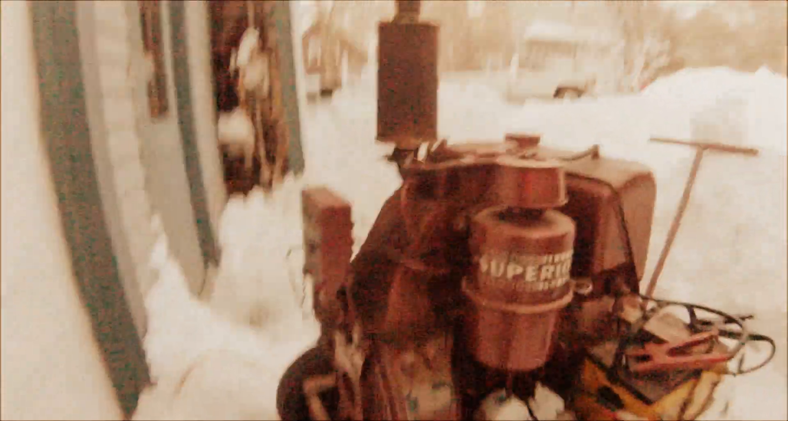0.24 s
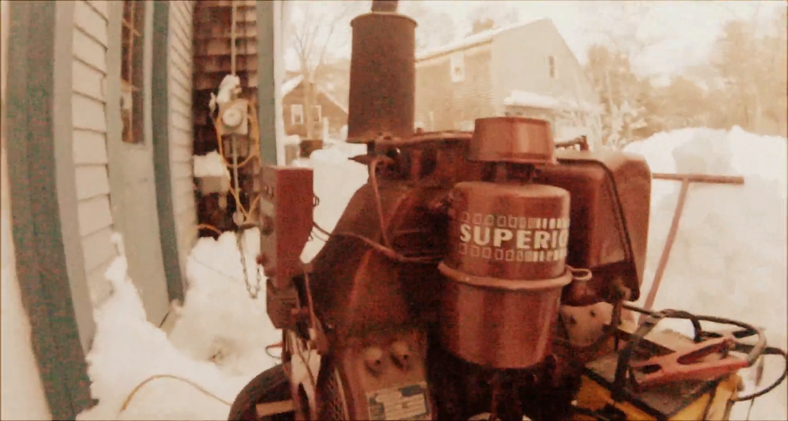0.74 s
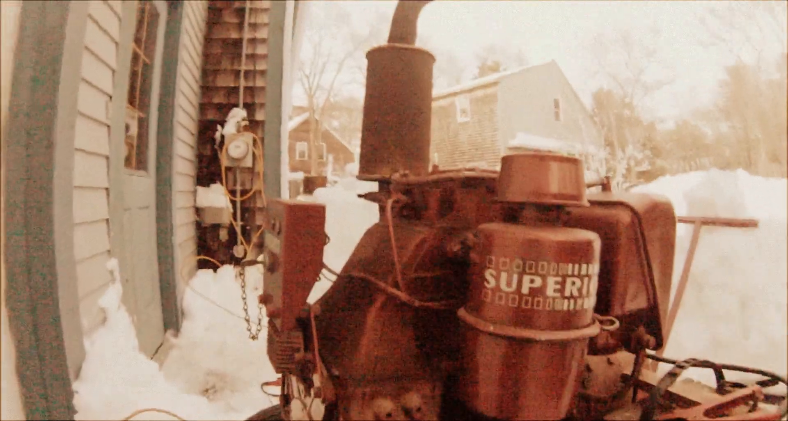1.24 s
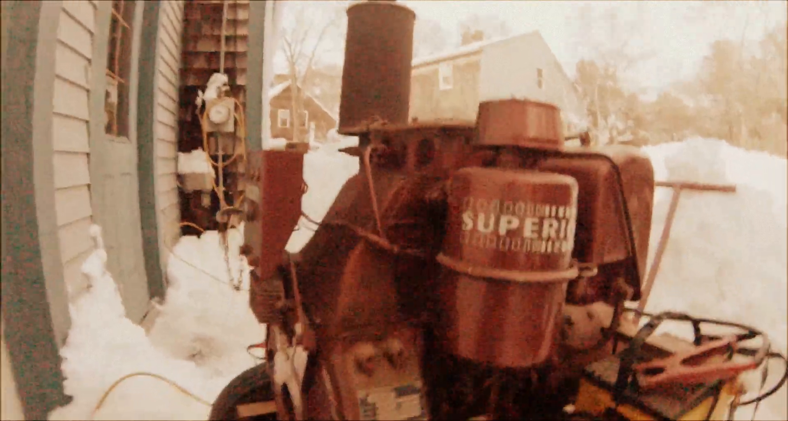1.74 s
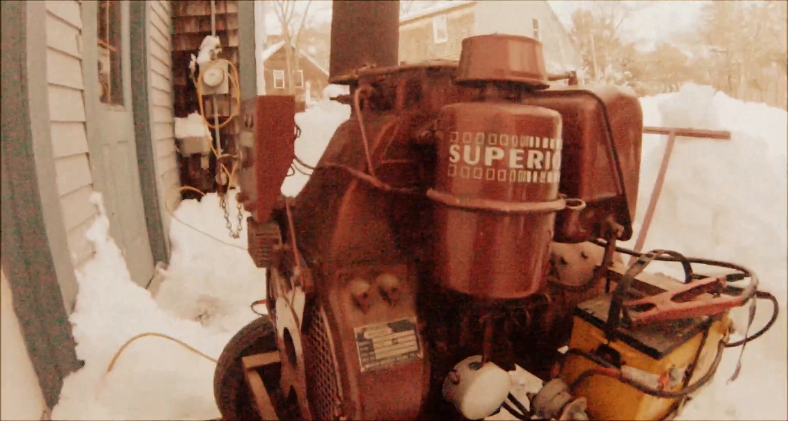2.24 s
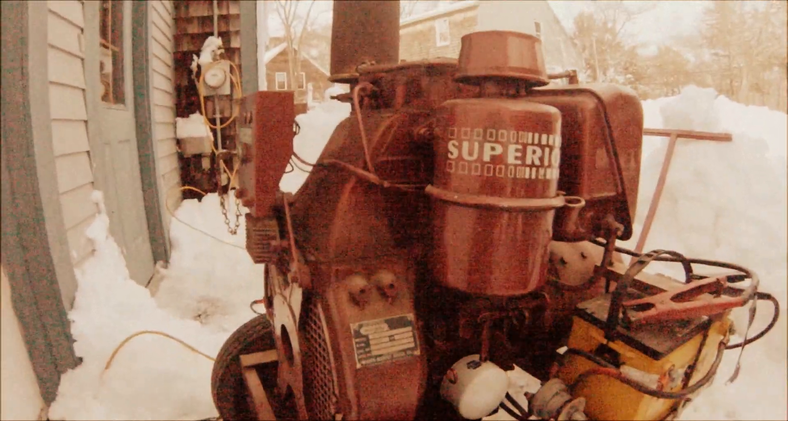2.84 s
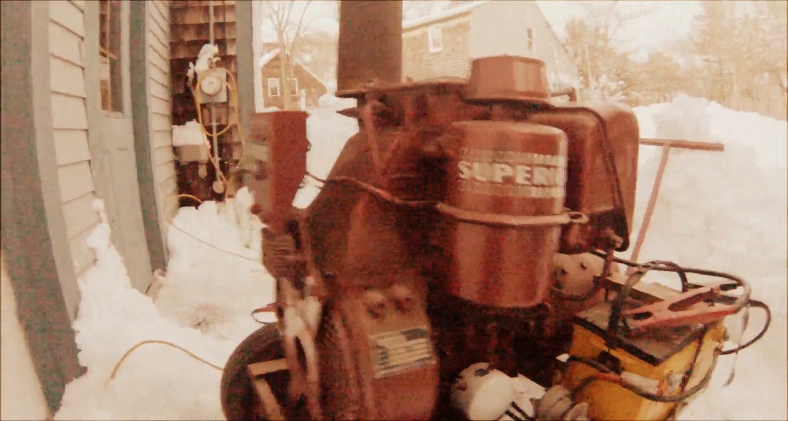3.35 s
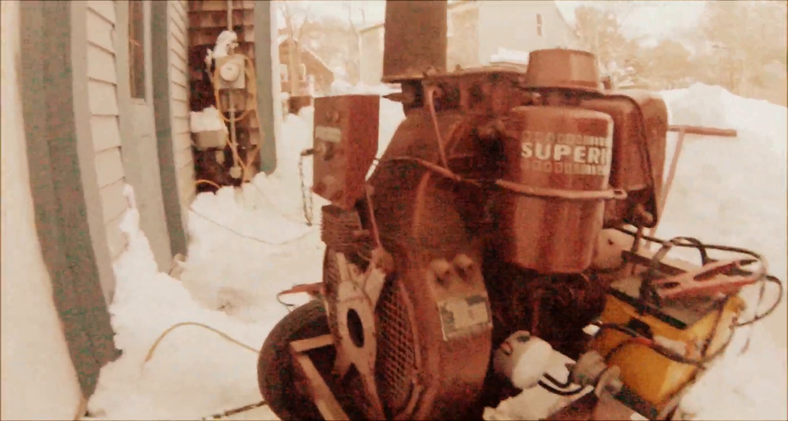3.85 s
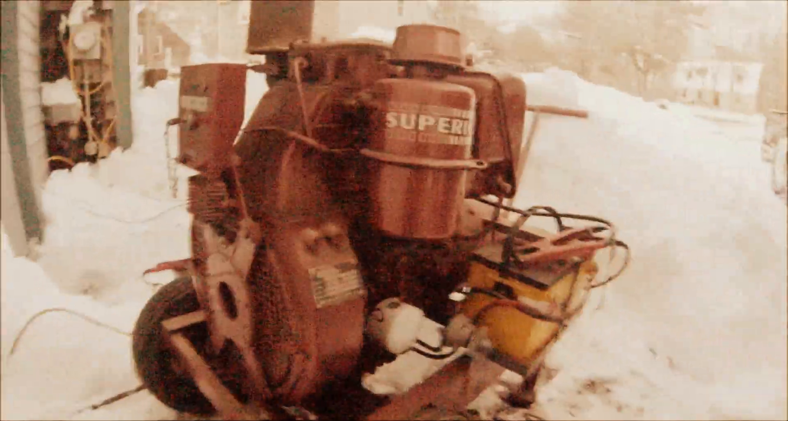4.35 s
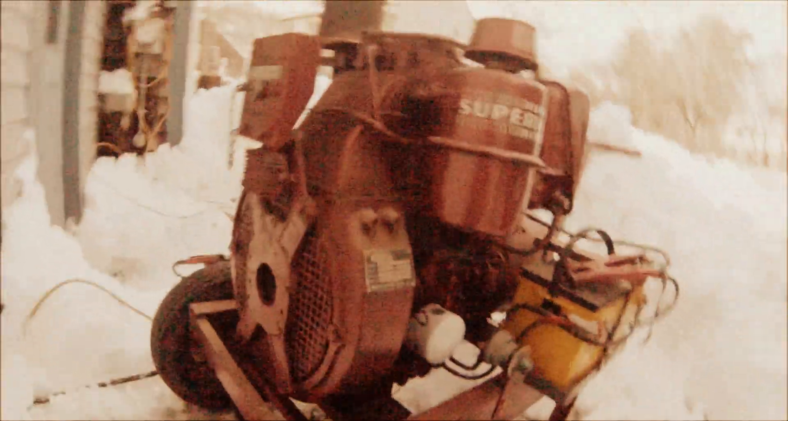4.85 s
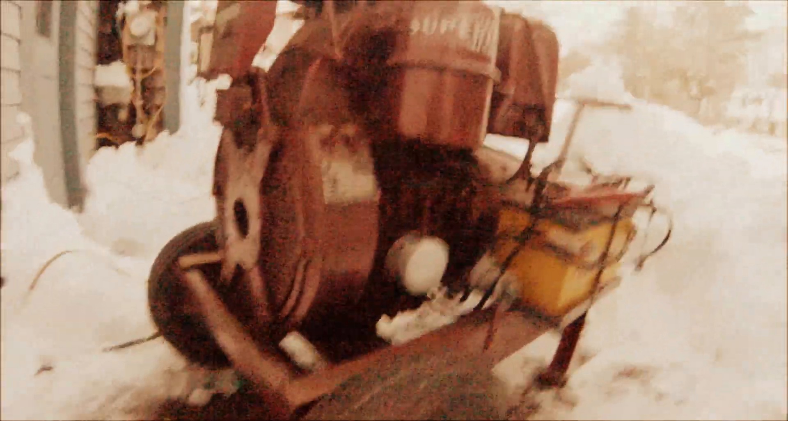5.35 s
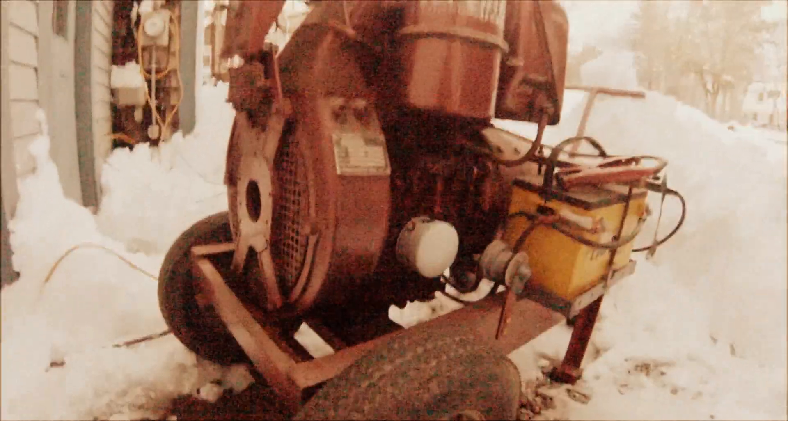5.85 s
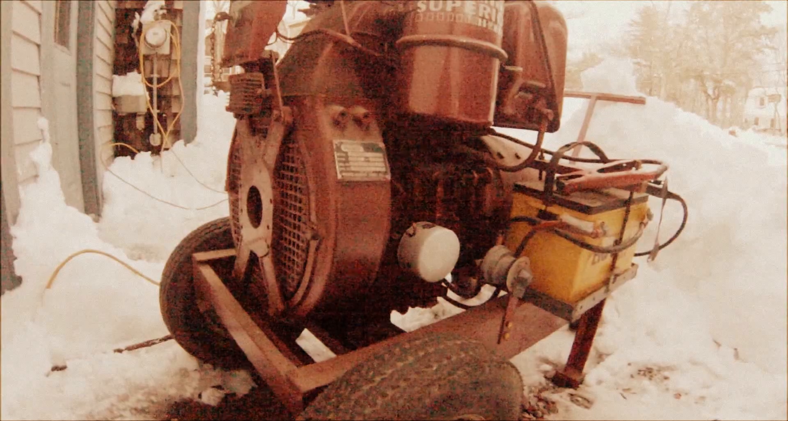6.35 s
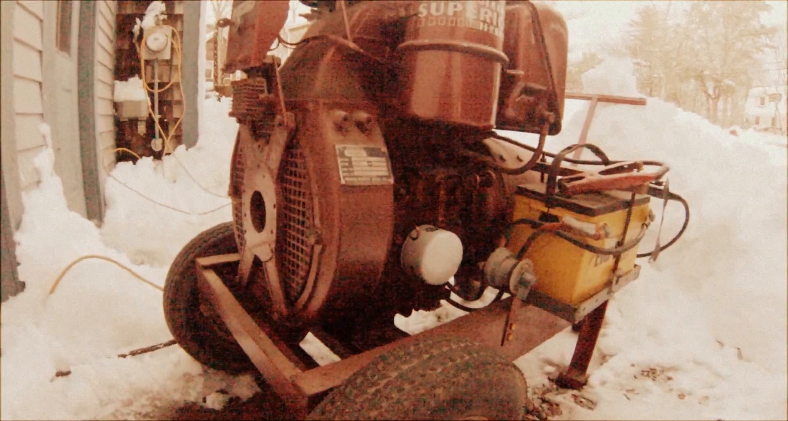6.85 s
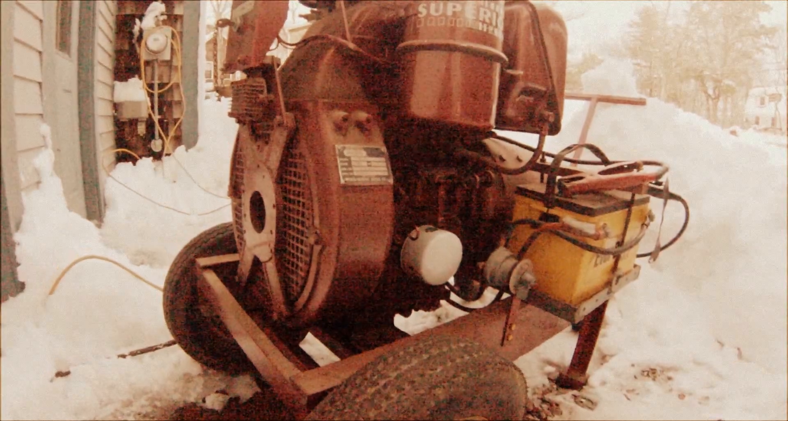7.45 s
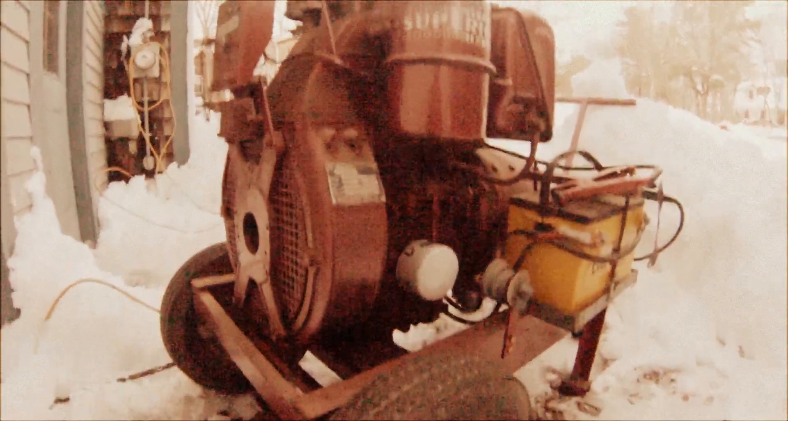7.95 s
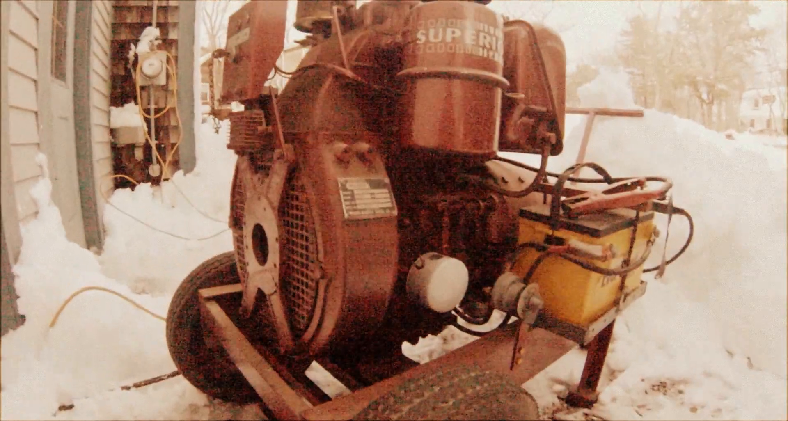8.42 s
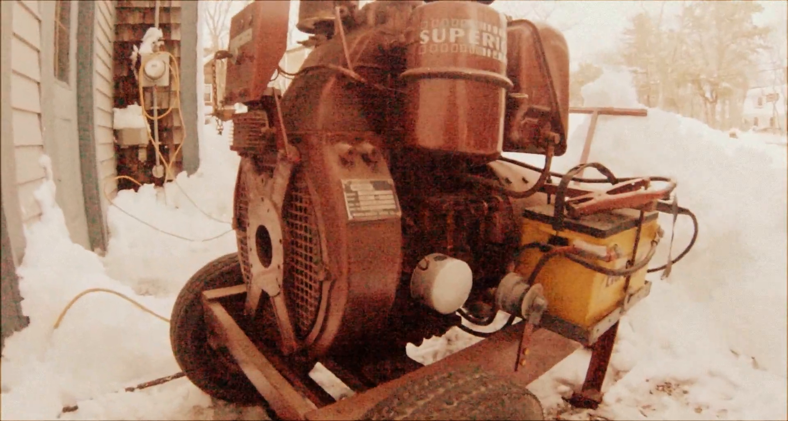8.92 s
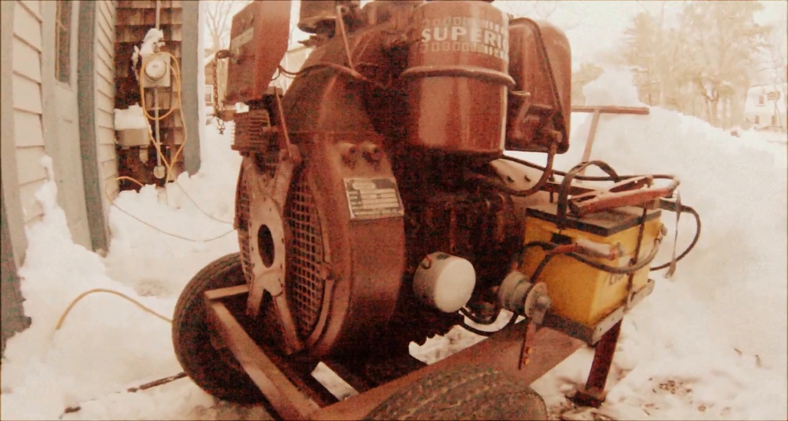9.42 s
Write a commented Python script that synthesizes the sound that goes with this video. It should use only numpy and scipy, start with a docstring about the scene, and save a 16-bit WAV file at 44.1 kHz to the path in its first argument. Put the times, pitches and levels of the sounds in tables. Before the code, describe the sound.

Close, even chugging and metallic rattle from a diesel generator, with dull microphone knocks and faint steps in snow around the middle.

```python
"""Single-cylinder four-stroke diesel generator at governed speed, in snow beside a house.
Each cycle: exhaust thump, piston knocks shaking the castings, valve ticks. Blower and gears whine above.
The microphone is carried from cylinder head down to crankcase. The hand rubs and bumps its case;
packed snow crunches underfoot."""
import sys
import numpy as np
from scipy import signal
from scipy.fft import irfft
from scipy.io import wavfile

SR = 44100
rng = np.random.default_rng(int(sys.argv[2]) if len(sys.argv) > 2 else 0)


def inscribe(sig):
    """Save sig as 16-bit PCM at rate SR to the path in sys.argv[1].

    A 1-D sig is mono; a 2-D sig holds one channel per row.
    Samples are clipped to [-1, 1] before scaling.
    """
    pcm = np.round(np.clip(np.atleast_2d(sig).T, -1, 1) * 32767)
    wavfile.write(sys.argv[1], SR, pcm.astype(np.int16))


N = 426888
TIME_S = np.arange(N) / SR
GOVERNED_RPM, HUNT_RPM, HUNTS_PER_S = 1835.0, .5, 2.0
START_CYCLE, PEAK_LOAD_TURN = .188, .38

# Levels are relative within a layer. Head, crankcase: level with the microphone there.
# Microphone path: (time [s], place [0 head .. 1 crankcase], whine gain [dB])
MIC_PATH = [(0, 0.17, -1.5), (.65, 0.069, 1.5), (1.4, 0, 0), (3.5, .18, 1.3), (4.5, 0.4, -1.5),
            (5.6, 0.87, 0.5), (7, 0.91, -0.7), (9.68, 0.69, 1.5)]
# Steps in snow: (time [s], hold [s], level [dB])
SNOW_STEPS = [(4.24, .02, -41), (4.48, 0.13, -35), (4.67, 0.03, -35), (4.88, 0.46, -38.5), (5.8, .02, -41)]
# Grip shifts: (time [s], hold [s], level [dB])
GRIP_RUBS = [(.14, 0.18, -32), (4.24, 0.033, -35.5), (4.38, 0.33, -32.5), (4.8, 0.5, -34), (5.7, 0.23, -35)]
# Finger bumps: (time [s], thud level [dB], thud pitch [Hz], click level [dB])
FINGER_BUMPS = [(.985, -21.5, 170, -39), (1.866, -23, 140, -47), (4.052, -14, 130, -45),
                (4.077, -10, 165, -20.5), (4.244, -18.5, 40, -25), (4.37, -15, 147, -33),
                (4.451, -15.5, 58, -45), (4.575, -11, 139, -28), (4.88, -9, 252, -36),
                (5.021, -10, 138, -27), (5.679, -10, 122, -44), (5.804, -9, 182, -31),
                (5.945, -20, 178, -42)]
# Microphone case modes: (frequency [Hz], t60 [s], level [dB])
MIC_CASE_MODES = [(490, 0.0073, -27), (655, 0.021, -0.5), (1350, 0.016, 2.5), (1560, 0.011, 4.5)]
# Blower and gear tones: (order [per crank turn, rounded in use], head [dB], crankcase [dB])
WHINE_ORDERS = [(15, -58, -49.5), (16, -51, -55), (17, -47.5, -57), (18, -56, -44.5), (19, -57.5, -49),
                (23, -63, -56), (33, -62, -50.5), (34, -55.5, -51.5), (35, -46.5, -51.5),
                (35.5, -43.5, -46.5), (37, -49, -60), (45, -47, -56.5), (47, -42.5, -45.5), (48, -50, -69),
                (50.54, -39.5, -50), (51, -65, -56), (52, -47, -48), (54, -42.5, -43), (54, -58, -43),
                (72.58, -42, -45), (71.04, -43, -44), (74.2, -52, -55)]
# Valve closings, one bounce each: (position [cycles], level [dB])
VALVE_HITS = [(.922, 0), (.962, -2), (.110, 0), (.17, -6)]
# Valve gear modes: (frequency [Hz], t60 [s], head [dB], crankcase [dB])
VALVE_MODES = [(6700, 0.02, -56, -34), (6940, 0.018, -63, -43), (7880, 0.014, -53, -44),
               (10040, 0.0062, -40, -43.5), (11230, 0.0067, -42.5, -45.5), (14460, 0.0073, -47, -44)]
# Blows in one cycle: (position [cycles], dull knock [dB], bright tick [dB])
CYCLE_BLOWS = [(.06, 3, -6), (.13, 6, 12), (.25, 6, -1), (.47, 1, -15), (.635, -1, -2), (.71, 6.5, 0),
               (.78, 1, 4), (.925, 4, 11), (.955, 3, 11)]
# Casting and cover resonances: (centre [Hz], width [Hz], head [dB], crankcase [dB])
CASTING_BANDS = [(322, 307, -51.5, -53), (507, 170, -49, -49), (709, 130, -50.5, -51),
                 (1073, 330, -45, -51.5), (1433, 250, -41.5, -45), (1555, 177, -36.5, -42.5),
                 (1890, 540, -49.5, -47), (2193, 143, -45.5, -47.5), (2457, 303, -41.5, -43.5),
                 (3388, 800, -43.5, -43.5), (4500, 1880, -46.5, -49), (6670, 960, -50, -50.5),
                 (8600, 1800, -60.5, -60), (10630, 3600, -57.5, -57.5), (14200, 1500, -67.5, -71)]
# Exhaust harmonics: (order [per firing], head [dB], crankcase [dB])
EXHAUST_ORDERS = [(1, -65, -58), (2, -41, -43.5), (3, -48.5, -45.5), (4, -51, -64), (5, -40.5, -38.5),
                  (6, -40.5, -37), (7, -52, -72), (9, -52.5, -53), (10, -48.5, -50), (11, -60.5, -57),
                  (12, -50, -55.5), (13, -56, -58.5)]


def from_db(db):
    """Decibels to gain."""
    return 10 ** (np.asarray(db) / 20)


def unit_rms(x):
    """Scale to unit power."""
    return x / np.sqrt(np.mean(x ** 2) + 1e-20)


def band(x, low_hz, high_hz, order=2):
    """Band-pass, unit power."""
    return unit_rms(signal.sosfilt(signal.butter(order, [low_hz, high_hz], "band", fs=SR, output="sos"), x))


def drift(per_s):
    """Slow random curve, unit power."""
    return unit_rms(np.interp(TIME_S * per_s, np.arange(4096), rng.standard_normal(4096)))


def ring(clicks, hz, t60_s):
    """One decaying sine per click."""
    radius = np.exp(-np.log(1000) / (t60_s * SR))
    step_rad = 2 * np.pi * hz / SR
    poles = [1, -2 * radius * np.cos(step_rad), radius ** 2]
    return signal.lfilter([0, np.sin(step_rad)], poles, clicks + 1e-18)


def mic_gain(place, head_db, crankcase_db):
    """Gain of a part between head and crankcase."""
    return from_db(head_db + place * (crankcase_db - head_db))


def swells(rows, attack_s, release_s):
    """Event envelopes: rise up to the start time, hold, decay."""
    return sum(from_db(db) * np.clip(1 + (TIME_S - at_s) / attack_s, 0, 1)
               * np.exp(-np.maximum(TIME_S - at_s - hold_s, 0) / release_s) for at_s, hold_s, db in rows)


def tap(at_s, db):
    """Single click."""
    return from_db(db) * (np.arange(N) == round(at_s * SR))


def grains(per_s, spread_db):
    """Clicks of random time, size and sign."""
    hits = rng.random(N) < per_s / SR
    sizes = from_db(spread_db * rng.exponential(1, N).clip(0, 4))
    return hits * sizes * rng.choice([-1, 1], N)


def strikes(cycle, position, spread_db, jitter_s):
    """One click per cycle at a set position, uneven in level and timing."""
    due_s = np.interp(np.arange(160) + position, cycle, TIME_S, left=-1, right=-1)
    timing, strength = rng.standard_normal((len(due_s), 2)).T
    at = ((due_s + jitter_s * timing) * SR).astype(int)
    inside = (at >= 0) & (at < N)
    clicks = np.zeros(N)
    clicks[at[inside]] = from_db(spread_db * strength[inside])
    return clicks


def footsteps(grains_per_s=1500):
    """Packed snow breaks in small grains underfoot."""
    crunch = band(grains(grains_per_s, spread_db=-1.5), 640, 4100, order=1)
    return swells(SNOW_STEPS, attack_s=.03, release_s=.085) * band(crunch, 190, 2770)


def rubbing(lump_db=4.5, slip_db=-3.5):
    """Hand on the microphone case: dull lumpy friction, small stick-slip thuds."""
    friction = rng.standard_normal(N) * from_db(lump_db * drift(45))
    rub = band(band(friction, 32, 154, order=1), 16, 350)
    slips = unit_rms(ring(grains(per_s=90, spread_db=1.5), hz=133.4, t60_s=.072))
    return swells(GRIP_RUBS, attack_s=.027, release_s=.063) * (rub + from_db(slip_db) * slips)


def bumps(thud_periods=4.2, knock_s=5.6848):
    """Fingers thud and click on the case; one hard knock also sways the microphone."""
    thuds = sum(ring(tap(at_s, db), hz, thud_periods / hz) for at_s, db, hz, _ in FINGER_BUMPS)
    sway = ring(tap(knock_s, db=-9), hz=27.7, t60_s=.28)
    clicks = tap(knock_s, db=-9) + sum(tap(at_s, db) for at_s, _, _, db in FINGER_BUMPS)
    case = sum((-1) ** k * from_db(db) * ring(clicks, hz, t60_s)
               for k, (hz, t60_s, db) in enumerate(MIC_CASE_MODES))
    return case - thuds - sway


def whine(cycle, place, slip_turns=.00096, waver_db=.8, wander_rad=.36, firing_db=.96):
    """Blades and teeth pass in step with the crank; uneven rotation splits each tone into a cluster."""
    crank_turns = 2 * cycle - PEAK_LOAD_TURN + slip_turns * drift(14)
    out = np.zeros(N)
    for order, head_db, crankcase_db in WHINE_ORDERS:
        # Low blower tones drone; high gear tones swell together once a turn, under load.
        scatter_rad = np.interp(order, [18, 72], [1.8, .55])
        phase_rad = 2 * np.pi * round(order) * crank_turns + scatter_rad * rng.standard_normal()
        gain = mic_gain(place, head_db, crankcase_db) * from_db(waver_db * drift(.89))
        out += gain * np.sin(phase_rad + wander_rad * drift(.99))
    return out * from_db(firing_db * drift(15))   # load varies per firing


def valves(cycle, place):
    """Valves close and bounce; the steel gear pings."""
    out = np.zeros(N)
    for hz, t60_s, head_db, crankcase_db in VALVE_MODES:
        clicks = sum(from_db(db) * strikes(cycle, position, spread_db=2.0, jitter_s=.0002)
                     for position, db in VALVE_HITS)
        out += mic_gain(place, head_db, crankcase_db) * ring(clicks, hz, t60_s)
    return out


def rattle_envelope(cycle, column, decay_s, rise_hz, spread_db, rush_db):
    """Steady rush plus a decaying burst per blow, unit power."""
    blows = sum((strikes(cycle, row[0], spread_db, jitter_s=.0001) * from_db(row[column])) ** 2
                for row in CYCLE_BLOWS)
    power = signal.lfilter([1], [1, -np.exp(-1 / (decay_s * SR))], blows + 1e-18)
    power = signal.lfilter(*signal.butter(1, rise_hz, fs=SR), power)
    return unit_rms(np.sqrt(from_db(rush_db) ** 2 + power))


def clatter(cycle, place, repeat_share=.59, repeat_hz=1700, bright_hz=6900, load_db=.67):
    """Blows shake the castings; part of the rattle repeats each cycle, less in the treble."""
    knock = rattle_envelope(cycle, column=1, decay_s=.00096, rise_hz=292, spread_db=1.6, rush_db=1.0)
    knock *= from_db(load_db * np.cos(2 * np.pi * (2 * cycle - PEAK_LOAD_TURN)))
    tick = rattle_envelope(cycle, column=2, decay_s=.0039, rise_hz=300, spread_db=2.0, rush_db=1.5)
    cycle_samples = int(N / (cycle[-1] - cycle[0]))
    out = np.zeros(N)
    for hz, width_hz, head_db, crankcase_db in CASTING_BANDS:
        fresh = rng.standard_normal(N)
        pattern = irfft(np.exp(2j * np.pi * rng.random(cycle_samples // 2 + 1)))
        repeated = unit_rms(np.interp(cycle % 1 * len(pattern), np.arange(len(pattern)), pattern))
        share = repeat_share / (1 + (hz / repeat_hz) ** 2)
        noise = np.sqrt(share) * repeated + np.sqrt(1 - share) * fresh
        tick_share = 1 / (1 + (bright_hz / hz) ** 4)
        envelope = np.sqrt(tick_share * tick ** 2 + (1 - tick_share) * knock ** 2)
        resonance = band(envelope * noise, hz - width_hz / 2, hz + width_hz / 2)
        out += mic_gain(place, head_db, crankcase_db) * resonance
    return out


def exhaust(cycle, place, open_cycle=.69, intake_cycle=.99, intake_gain=.81, smear_rad=1.42):
    """Blow-down and intake gulp drive the pipe harmonics; the jet adds low flutter."""
    thump = np.zeros(N)
    for order, head_db, crankcase_db in EXHAUST_ORDERS:
        rad_per_cycle = 2 * np.pi * order
        blow_down = 1j * np.exp(-1j * rad_per_cycle * open_cycle)   # push-pull swing
        gulp = intake_gain * np.exp(-1j * rad_per_cycle * intake_cycle)   # single bulge
        silencer_lag_rad = smear_rad * (order / 10) ** 2 * rng.standard_normal()
        phase_rad = rad_per_cycle * cycle + np.angle(blow_down + gulp) - silencer_lag_rad
        thump += np.sqrt(2) * mic_gain(place, head_db, crankcase_db) * np.cos(phase_rad)
    jet = band(rng.standard_normal(N), 13, 36, order=1)
    flutter = mic_gain(place, head_db=-42, crankcase_db=-46) * band(jet, 10, 190)
    return thump * from_db(-.1 * drift(32)) + flutter


def scene(metal_db=.26):
    """One firing per two crank turns; the governor hunts slightly."""
    rpm = GOVERNED_RPM + HUNT_RPM * drift(HUNTS_PER_S)
    cycle = START_CYCLE + np.cumsum(rpm / 60 / 2) / SR
    path_s, *curves = np.transpose(MIC_PATH)
    place, whine_db = (np.interp(TIME_S, path_s, curve) for curve in curves)
    metal = clatter(cycle, place) + from_db(whine_db) * whine(cycle, place) + valves(cycle, place)
    engine = exhaust(cycle, place) + from_db(metal_db) * metal
    return (engine + bumps() + rubbing() + footsteps())[None]


def record(dry):
    """Steep low-pass."""
    cutoff_hz = 15300
    return signal.sosfilt(signal.ellip(10, .2, 90, cutoff_hz, fs=SR, output="sos"), dry)


dry = scene()
out = record(dry)
inscribe(out)
```